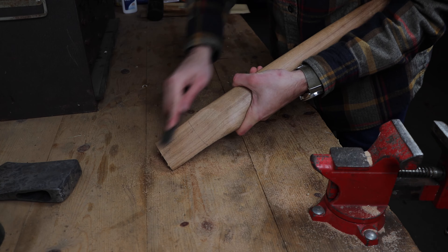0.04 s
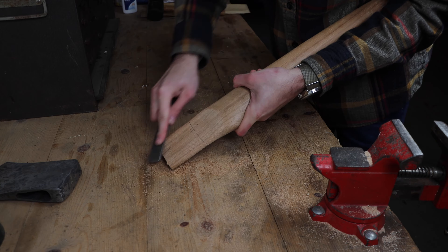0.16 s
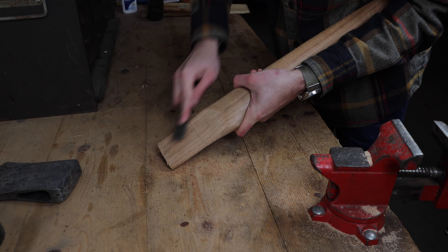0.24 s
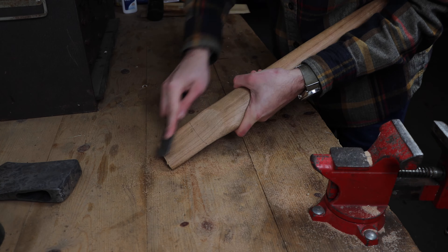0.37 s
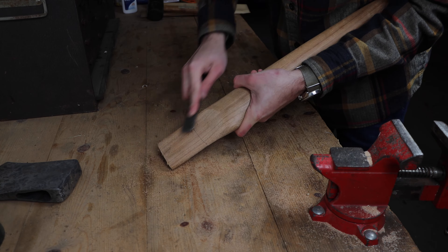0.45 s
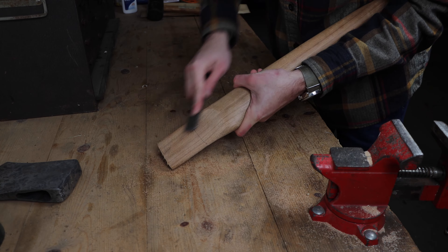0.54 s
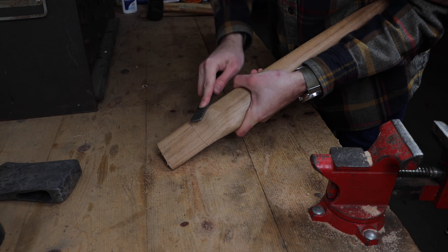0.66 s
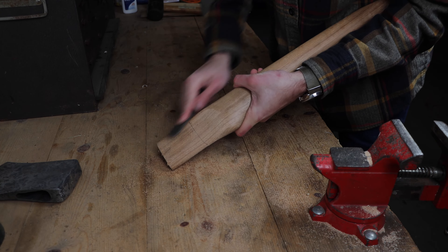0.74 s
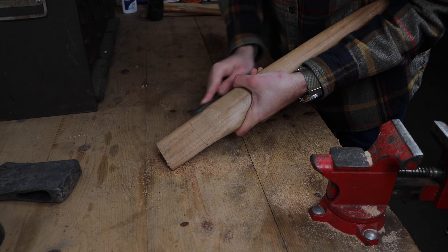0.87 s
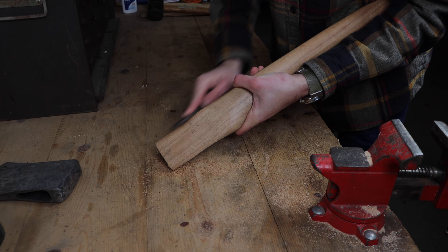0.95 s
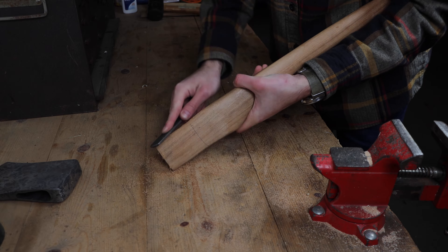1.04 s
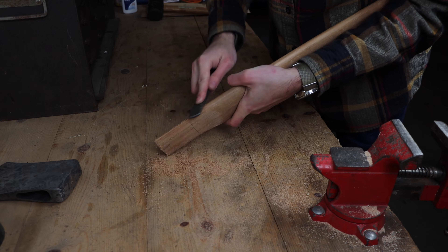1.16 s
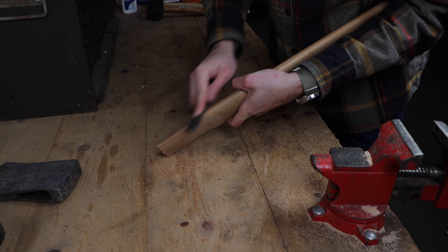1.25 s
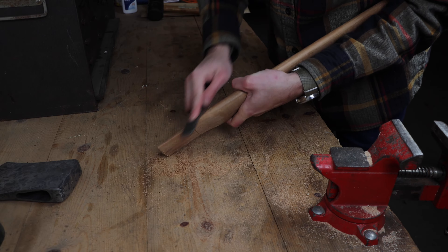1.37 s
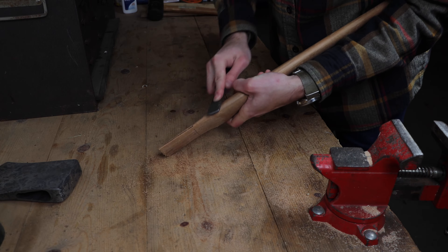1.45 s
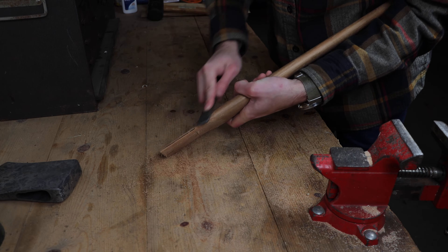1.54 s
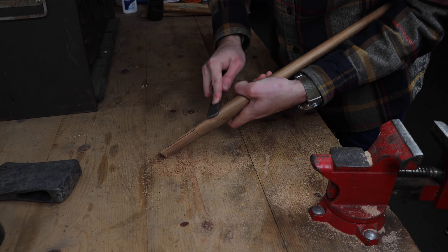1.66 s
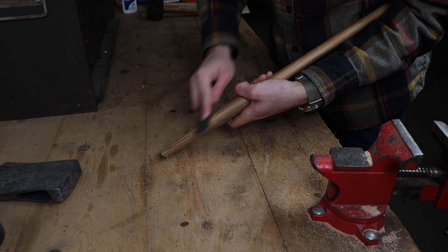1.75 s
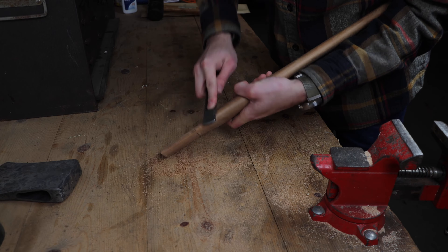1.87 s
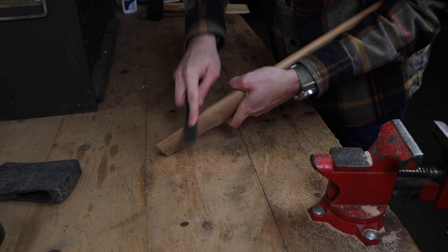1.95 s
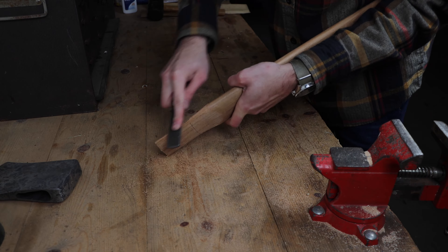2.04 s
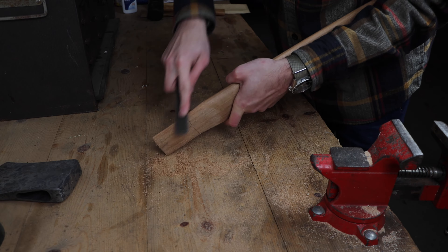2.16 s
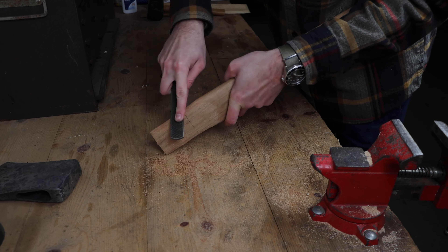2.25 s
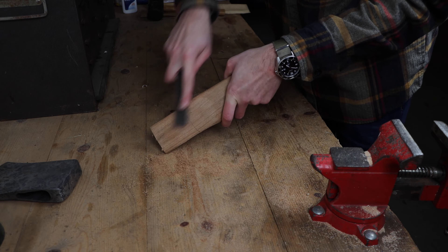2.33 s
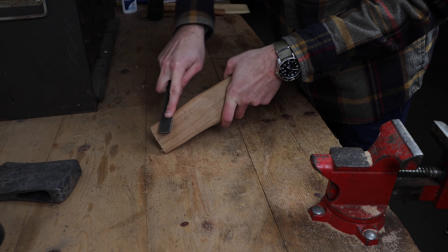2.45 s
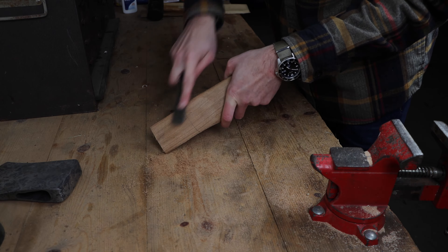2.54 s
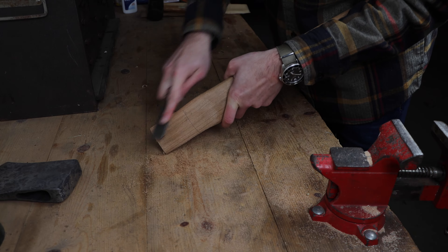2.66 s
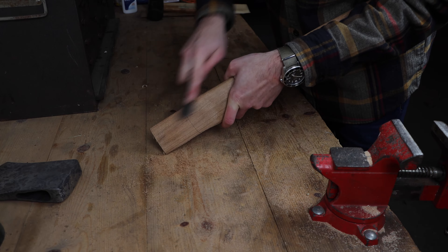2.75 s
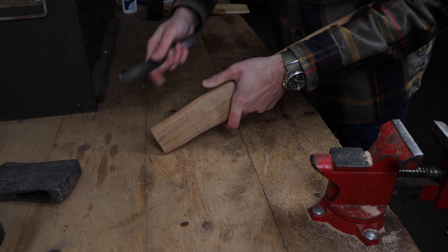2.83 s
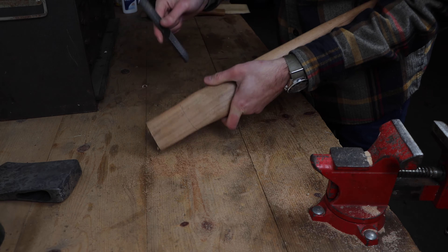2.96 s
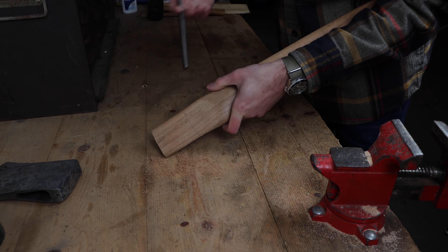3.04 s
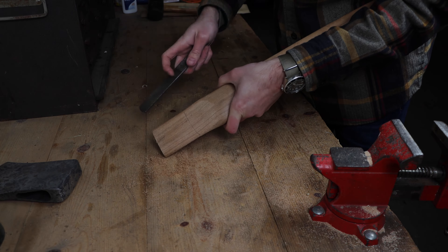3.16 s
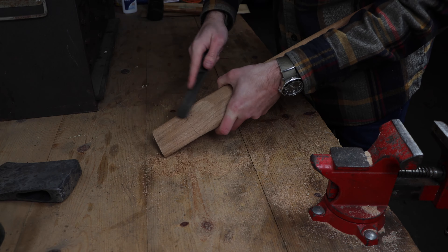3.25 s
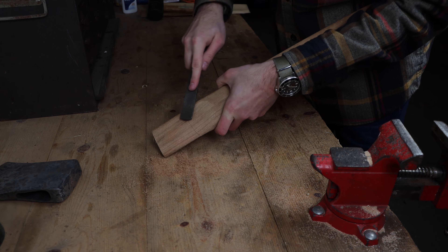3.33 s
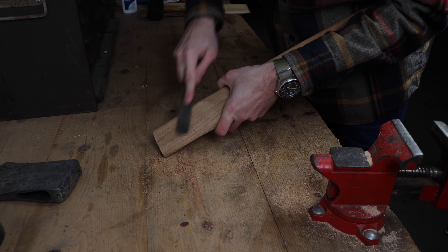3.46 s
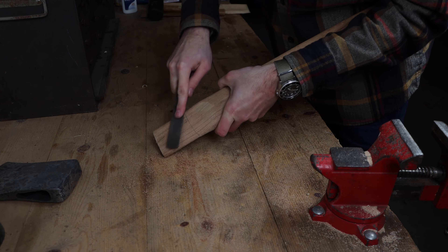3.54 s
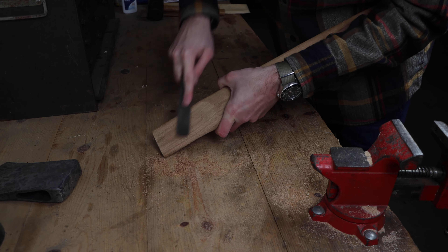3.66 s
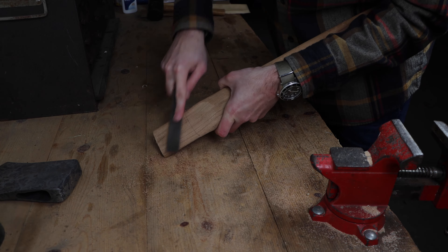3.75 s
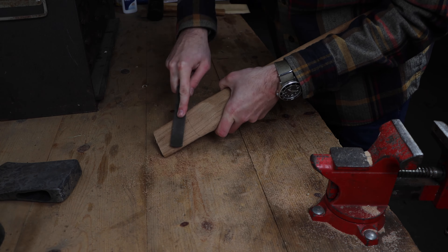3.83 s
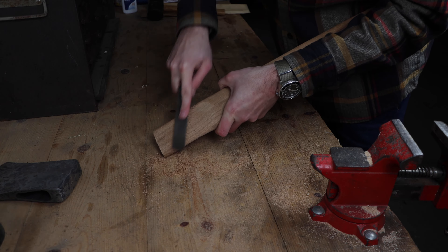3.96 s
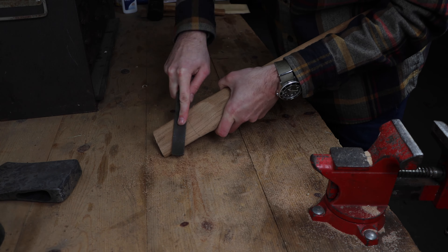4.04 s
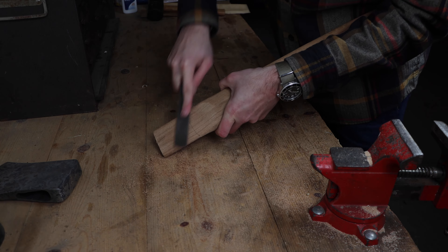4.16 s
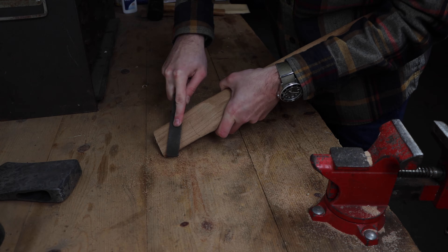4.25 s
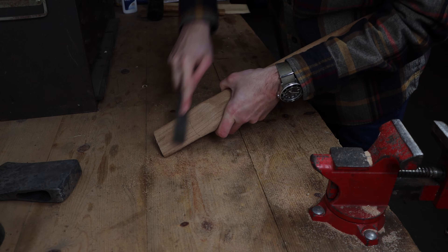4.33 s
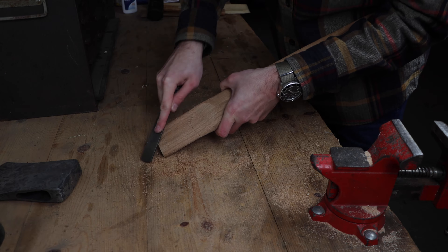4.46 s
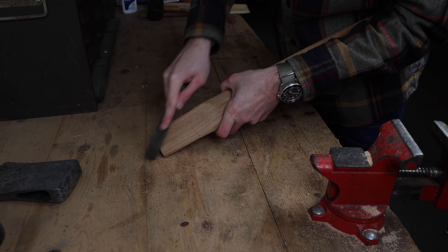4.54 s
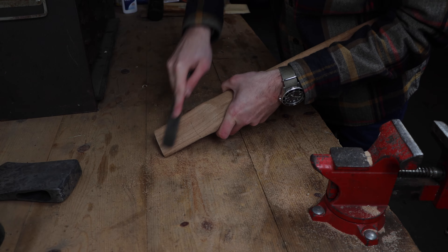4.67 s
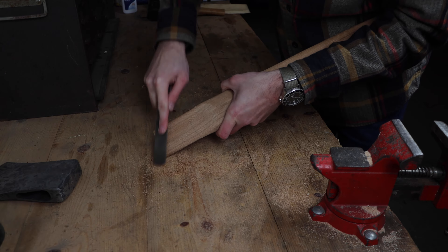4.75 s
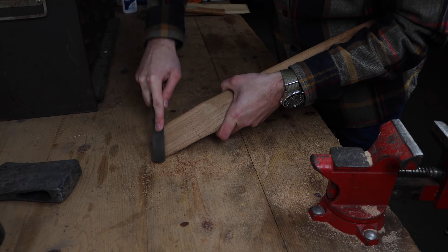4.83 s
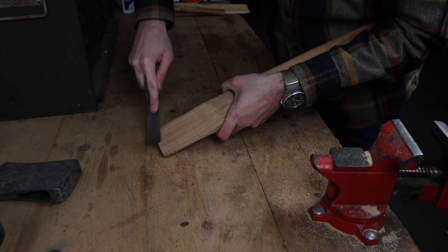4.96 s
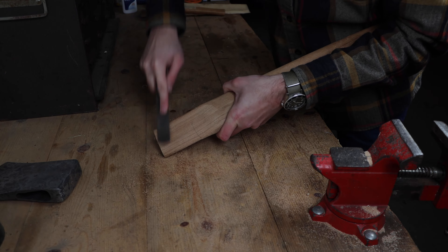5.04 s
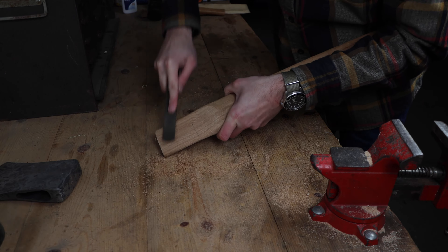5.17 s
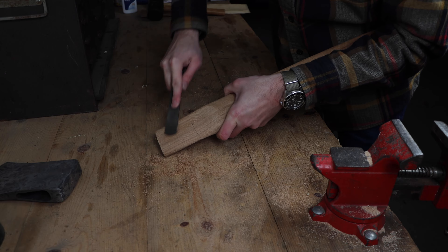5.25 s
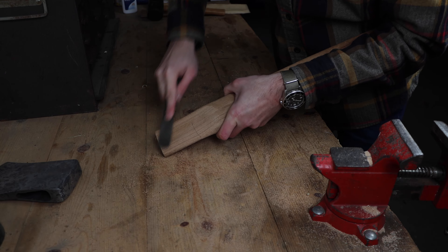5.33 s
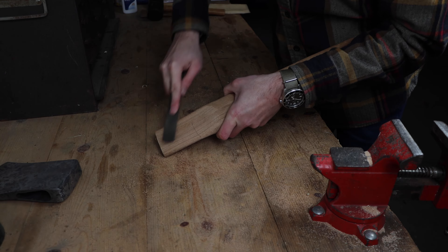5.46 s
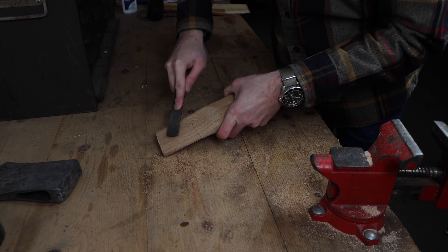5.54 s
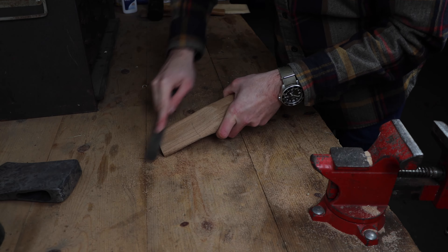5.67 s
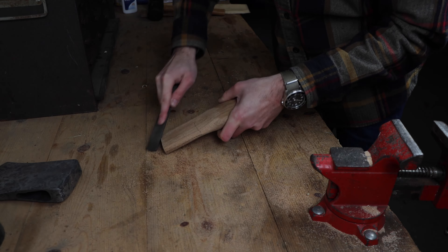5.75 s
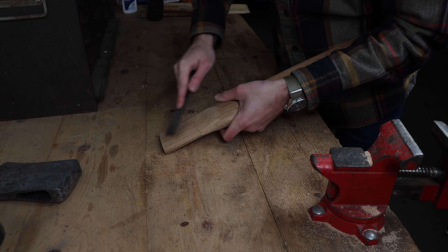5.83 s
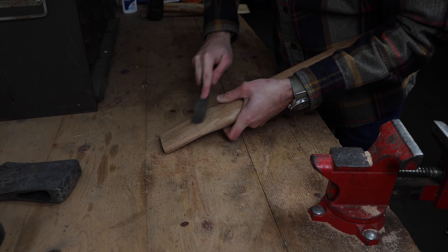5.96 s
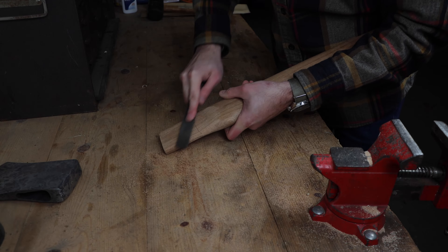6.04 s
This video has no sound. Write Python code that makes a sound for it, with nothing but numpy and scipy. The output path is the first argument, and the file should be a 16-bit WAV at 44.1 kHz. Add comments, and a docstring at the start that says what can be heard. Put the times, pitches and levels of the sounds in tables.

```python
"""Filing a wooden handle

A steel hand file scrubs quickly to and fro over a wooden handle whose end rests on a workbench.
Its teeth catch in a dense rattle that rings the bench, the handle and the file; the wood knocks
a few times and fingers brush it in the pauses. A small workshop answers, over a faint electric hum."""
import sys
import numpy as np
from scipy import signal
from scipy.fft import rfft, irfft
from scipy.io import wavfile
from scipy.ndimage import uniform_filter1d

SR = 44100
rng = np.random.default_rng(int(sys.argv[2]) if len(sys.argv) > 2 else 0)


def digitize_waveform(pressure):
    """Quantize a signal to 16-bit integers and store it at the path in sys.argv[1].

    Rows of a 2-D input are taken as channels; values are limited to [-1, 1].
    """
    field = np.atleast_2d(pressure).T
    bounded = np.clip(field, -1, 1)
    quanta = np.round(bounded * 32767).astype(np.int16)
    wavfile.write(sys.argv[1], SR, quanta)


N = 269010
T = np.arange(N) / SR
BENCH, SHAFT, HEAD, BLADE, TEETH = range(5)  # sounding parts, in column order
FREE_BLADE = 4  # knocks have this part in place of TEETH

# strokes, push and pull in turn: centre t/s, nominal length/ms, strength/dB, bite (extra cut depth)/dB
FILE_STROKES = [(0.01, 71, -42, 2.5), (0.06, 56, -41.5, 3), (0.117, 61, -44.0, 1.5), (0.173, 59, -39.5, -1),
                (0.225, 63, -44.5, -3.5), (0.276, 49, -41.0, -2), (0.338, 43, -41, 1),
                (0.382, 54, -38.5, -1.5), (0.441, 73, -46.5, -4.5), (0.498, 57, -39, -4),
                (0.556, 56, -44.5, -3.5), (0.605, 66, -42.0, -5), (0.663, 56, -42, -0.5),
                (0.721, 62, -41, 0), (0.777, 57, -44.5, 2.5), (0.827, 52, -39, -3), (0.879, 64, -44.5, 4),
                (0.93, 42, -40.5, -2), (0.984, 65, -45.5, 6), (1.036, 35, -40, 4), (1.198, 66, -55.5, 7),
                (1.27, 53, -38.5, -2), (1.327, 39, -38, 3), (1.394, 66, -40.0, 0.5), (1.447, 36, -39, -2),
                (1.502, 54, -41.5, -2.5), (1.556, 39, -39, 1), (1.609, 55, -40, 0.5),
                (1.666, 46, -40.5, -1.5), (1.723, 61, -40.5, -5), (1.776, 38, -39, -1.5),
                (1.828, 56, -39, -1), (1.881, 40, -43, -5.5), (1.935, 46, -34.5, -2),
                (1.995, 40, -36.0, 6.5), (2.046, 42, -34, -4), (2.098, 33, -40, 3.5),
                (2.146, 47, -38.0, -1), (2.197, 36, -40.0, 4.5), (2.251, 39, -34, 5.5),
                (2.307, 32, -42, -5), (2.354, 57, -40.5, -4), (2.41, 43, -43.5, -5.5),
                (2.46, 58, -39.5, 0.5), (2.513, 48, -48.5, -4.5), (2.564, 45, -36, 1.5),
                (2.622, 47, -42.0, -3), (2.676, 39, -33, 7.5), (2.733, 45, -40.5, -4),
                (2.78, 39, -37.5, -3), (3.419, 74, -37.5, 2.5), (3.482, 41, -39, 5), (3.533, 54, -34, 0),
                (3.589, 45, -40.5, 3), (3.635, 52, -34.5, 0), (3.688, 51, -40.5, 6), (3.739, 46, -33, 1.0),
                (3.79, 45, -39, 0), (3.838, 49, -35.0, 0), (3.893, 33, -42, 2), (3.94, 50, -35.5, -2),
                (3.994, 63, -41.5, 3), (4.047, 49, -35.5, -1.5), (4.094, 41, -37.5, 2),
                (4.146, 49, -35.0, -2.5), (4.197, 48, -39.5, 2), (4.253, 47, -34.5, -4),
                (4.307, 55, -40.5, 0), (4.357, 49, -34.5, -3.5), (4.41, 50, -42.5, 0.5),
                (4.46, 58, -41, -0.5), (4.503, 45, -41, -4.5), (4.555, 57, -41, 0.5), (4.6, 36, -41.5, 0.5),
                (4.642, 54, -41, 1), (4.694, 45, -43, 0), (4.746, 46, -37, 3), (4.792, 34, -36.5, -0.5),
                (4.834, 46, -30, 0.5), (4.881, 40, -34.5, -0.5), (4.925, 39, -32.5, -2.5),
                (4.97, 35, -36.5, 9), (5.017, 41, -32.5, -1.5), (5.064, 39, -35.5, -1.5),
                (5.108, 54, -33, -0.5), (5.159, 41, -37.5, 1.0), (5.207, 59, -31.5, 3.5),
                (5.258, 50, -38, -3.5), (5.311, 51, -33, 2), (5.357, 38, -38, -2.0), (5.407, 59, -34, 0.5),
                (5.451, 46, -41.5, 1.0), (5.503, 55, -37, -3.5), (5.545, 44, -41, -0.5),
                (5.594, 55, -36.0, 2), (5.634, 44, -42.5, 0), (5.686, 66, -38, 1.5), (5.729, 33, -29.5, -1),
                (5.765, 37, -39.5, -1), (5.795, 36, -58, -2), (5.972, 50, -49.0, 4.5),
                (6.035, 56, -38.0, 0.0), (6.084, 55, -44, -6)]
# pauses after which the push/pull order flips: t/s
FLIP_TIMES_S = [3.1, 5.9]
# handle turned and regripped, push gains: from t/s, bench/dB, shaft/dB, head/dB, blade/dB, teeth/dB
PUSH_GAINS = [(0, 5, 5.5, 0, -1, -6), (1.15, 0.5, 4.5, 4, 0.5, -5), (1.97, 4, 6.7, 4.5, -3.5, -9),
              (3.1, 5, 7.3, 1.5, -1, -10), (4.39, 5, 6, -3, 1, -4.5), (4.72, -1, 3.7, 4.5, 4, -2.5),
              (5.33, 1.5, 4.8, 0, 2.5, -2.5), (5.71, -10, 6.6, 7, -3, -13), (5.9, 1.5, 6.6, 4, 3, -8)]
# same columns for a pull, which presses the handle less onto the bench
PULL_GAINS = [(0, -2, 3, 4.2, 0, -6.5), (1.15, -3, 9.5, 9.4, -2, -10), (1.97, -11, 10, 9.7, -0.5, -11.5),
              (3.1, -7, -3, 6.4, 3, -2), (4.39, -0.5, 2.5, 1.3, 5, -4), (4.72, -5, 2, 3.6, 9, -3.5),
              (5.33, -10, 1, 4.2, 8.5, 0.5), (5.71, 0, 8.5, 0.92, -0.5, -11.5),
              (5.9, 0.5, 9.5, 1.6, 3, -14)]
# a deep cut shakes the handle and mutes the file; per part: gain/(dB per dB of bite)
BITE_SLOPES = [-0.075, 0.57, 0.28, -0.48, -0.36]
# modes of the bench and of the handle's shaft and head: f/Hz, width/Hz, level/dB
BENCH_MODES = [(186.7, 30, -8.5), (271, 73, -8), (316.3, 42.4, 0), (423, 57.6, -4.5)]
SHAFT_MODES = [(572, 50.4, 0), (644.7, 57, -2), (759, 70, -2.5), (876, 113, -6), (992, 53, -2.5),
               (1170, 50, -2.5), (1367, 30, -9)]
HEAD_MODES = [(1675, 92, 0.5), (1870, 71, -4.5), (1960, 70, 0), (2142, 85, 0.5), (2336, 350, -9)]
# modes of the file, pressed, held loosely or ringing freely: f/Hz, width/Hz, level/dB
BLADE_PRESSED_MODES = [(2520, 91, -15), (3200, 104, 1), (3425, 50, 1.5), (3538, 98, -4.5),
                       (3880, 200, -15.5), (4840, 246, -7), (5590, 360, -15.5), (6687, 187, -5.5),
                       (7260, 220, -15), (7500, 320, -14), (8910, 470, -11.5)]
BLADE_LOOSE_MODES = [(2500, 27, 10), (3074, 220, 2), (4190, 400, -1), (4920, 83, -21), (4740, 400, -13.5),
                     (6147, 150, -0.5), (7500, 470, -9), (7800, 33, -21), (8330, 200, -7)]
BLADE_FREE_MODES = [(1670, 46, 6), (2640, 30, 5.5), (3095, 27, -11), (3930, 40, -2), (4100, 27, -19),
                    (5000, 50, -13), (6100, 70, -18), (8600, 70, -19)]
TEETH_PRESSED_MODES = [(10560, 600, -3.5), (12100, 140, -3), (12750, 790, -3), (14100, 1000, 1.5),
                       (14440, 500, -15), (15760, 220, 3)]
TEETH_LOOSE_MODES = [(10100, 240, -2), (12000, 230, -0.5), (12800, 250, -2), (12650, 260, 1),
                     (13300, 460, 0), (15300, 1400, -5.5)]
# file contact: t/s, looseness (0 pressed flat on the face, 1 resting lightly on the edge)
LOOSENESS = [(0, 0.07), (1.1, 0.18), (1.2, 0.99), (2.2, 0.98), (2.4, 0.39), (2.9, 0.17), (3.0, 0.81),
             (3.35, 0.94), (3.4, 0.15), (4.4, 0.27), (4.8, 0.017), (6.1, 0.083)]
# swept band of the rasp: t/s, gain/dB
SWEEP_GAINS = [(0, -5), (0.6, -4), (0.9, -14), (1.2, -20), (3.3, -20), (3.4, -15), (4.5, -15), (4.8, -20),
               (6.1, -20)]
# room air: f/Hz, relative spectral density/dB
AIR_SPECTRUM = [(30, -19), (100, -3), (160, -5), (300, -7), (600, -2.5), (1040, -7), (1720, -12),
                (4000, -24), (16000, -37.5)]
# electric hum: f/Hz, level/dB
HUM_LINES = [(360.7, -59.5), (452.2, -71), (602.9, -59), (764.4, -66), (1206, -70)]
# finger brushes: centre t/s, length/ms, level/dB
FINGER_BRUSHES = [(1.105, 130, -54), (2.962, 26, -68), (3.02, 45, -51.5), (3.195, 41, -66),
                  (5.876, 10, -54), (5.86, 180, -65)]
# knocks: t/s, level/dB, offsets/dB (bench, shaft, head, held blade, free blade), contact time factor
WOOD_KNOCKS = [(1.1214, -11.5, -5, -18.5, -22, -50, -62, 2.9),
               (3.0024, -8, -12.5, -11.5, -20.5, -16, -60, 3.23),
               (3.2779, -21, -37, -12.5, -19, -9, -5.5, 1), (4.478, -16, -24, -12, -9.5, -8.5, -40, 0.87),
               (5.5131, -12.5, -34, -15.5, -13.5, -18, -50, 1.7),
               (5.6040, -18, -30, -10, -20, -20, -50, 1.7), (5.6987, -8, -51, -13, -17, -16, -50, 1.1),
               (5.765, -11.5, -42, -9.5, -11, -7.5, -50, 1.6),
               (5.8736, -22.5, -14.5, -8.5, -11.5, -1.5, -50, 4.1)]


def undb(db):
    return 10 ** (np.asarray(db) / 20)


def walk(rate_hz):
    """Random levels joined by ramps; spread near 1."""
    step = int(SR / rate_hz)
    held = np.repeat(rng.standard_normal(N // step + 1), step)[:N]
    return 1.2 * uniform_filter1d(held, step)


def arches(motions, exponent, stretch=1.0):
    """Each (t/s, length/ms, level/dB) motion speeds up, then stops; a higher exponent narrows it."""
    power = np.zeros(N)
    for centre_s, length_ms, db in motions:
        half_s = stretch * length_ms / 2000
        start, end = (int(np.clip((centre_s + side * half_s) * SR, 0, N)) for side in (-1, 1))
        arch = np.cos(np.pi / 2 * np.clip((T[start:end] - centre_s) / half_s, -1, 1))
        power[start:end] += (undb(db) * arch ** exponent) ** 2
    return np.sqrt(power)


def strokes(part, exponent, stretch, drag_share=0.072, drag_ms=39.5):
    """One part's envelope from strength, grip and bite; the file drags on faintly as it turns."""
    centre_s, length_ms, strength_db, bite_db = np.transpose(FILE_STROKES)
    is_push = (np.arange(len(centre_s)) + np.searchsorted(FLIP_TIMES_S, centre_s)) % 2 == 1
    push_db, pull_db = (grips[np.searchsorted(grips[:, 0], centre_s) - 1, 1 + part]
                        for grips in (np.array(PUSH_GAINS), np.array(PULL_GAINS)))
    level_db = strength_db + np.where(is_push, push_db, pull_db) + BITE_SLOPES[part] * bite_db
    power = arches(np.c_[centre_s, length_ms, level_db], exponent, stretch) ** 2
    drag = np.abs(uniform_filter1d(power, int(drag_ms * SR / 1000)))
    return np.sqrt(power + drag_share * drag)


def rattle(catches_per_s, spread_db, slip_db, slip_hz):
    """Teeth catch at random with uneven force, in short bursts as the file grips and slips."""
    caught = rng.random(N) < catches_per_s / SR
    force = caught * rng.standard_normal(N) * undb(spread_db * rng.exponential(size=N))
    force *= undb(slip_db * walk(slip_hz))
    return force / np.sqrt(np.mean(force ** 2))


def ring(rub, blow, modes, wander_db=0.0, wander_hz=25):
    """Damped modes of alternating sign; the rub reaches each unevenly as the contact moves."""
    impulse = signal.unit_impulse(8192)
    out, response = 0, 0
    for k, (hz, width_hz, db) in enumerate(modes):
        sign = (-1) ** k
        b, a = signal.iirpeak(hz, hz / width_hz, SR)
        force = rub * undb(wander_db * walk(wander_hz)) + sign * blow  # a blow starts all modes in step
        out += sign * undb(db) * signal.lfilter(b, a, force)
        response += sign * undb(db) * signal.lfilter(b, a, impulse)
    return out / np.sqrt(np.sum(response ** 2))


def wood():
    """Rattle and knocks shake bench and handle, which radiate neither deep bass nor treble."""
    coarse = rattle(catches_per_s=6000, spread_db=1.5, slip_db=1.04, slip_hz=220)
    bench = ring(coarse * strokes(BENCH, exponent=1.27, stretch=1.26),
                 knocks(BENCH, base_ms=0.84, gain_db=22.5), BENCH_MODES, wander_db=1.0)
    shaft = ring(coarse * strokes(SHAFT, exponent=1.4, stretch=1.09),
                 knocks(SHAFT, base_ms=0.21, gain_db=23.0), SHAFT_MODES, wander_db=2.5)
    head = ring(coarse * strokes(HEAD, exponent=1.7, stretch=1.0),
                knocks(HEAD, base_ms=0.15, gain_db=22.5), HEAD_MODES, wander_db=3.0)
    radiation = signal.butter(4, [160, 3200], "band", fs=SR, output="sos")
    return signal.sosfilt(radiation, bench + shaft + head)


def steel_file():
    """The blade rings and its teeth hiss through the fibres; a loose hold brings out other modes."""
    fine = rattle(catches_per_s=20000, spread_db=1.36, slip_db=2.0, slip_hz=160)
    rub = fine * strokes(BLADE, exponent=1.28, stretch=0.94)
    hiss = rng.standard_normal(N) * undb(1.24 * walk(rate_hz=200))
    hiss *= strokes(TEETH, exponent=1.54, stretch=0.92)
    blow = knocks(BLADE, base_ms=0.093, gain_db=14.5)
    out = ring(0, knocks(FREE_BLADE, base_ms=0.03, gain_db=19.0), BLADE_FREE_MODES)
    loose = np.interp(T, *np.transpose(LOOSENESS))
    for gain, blade_modes, teeth_modes in ((np.sqrt(1 - loose), BLADE_PRESSED_MODES, TEETH_PRESSED_MODES),
                                           (np.sqrt(loose), BLADE_LOOSE_MODES, TEETH_LOOSE_MODES)):
        out += ring(gain * rub, gain * blow, blade_modes, wander_db=1.86)
        out += ring(gain * hiss, gain * blow * undb(-6), teeth_modes, wander_db=3.0)
    return out


def rasp_sweep(low_hz=4400, high_hz=8200, half_width_hz=400, rising_db=-7):
    """Contact runs along the blade: a noise band falls early in one stroke, rises late in the next."""
    centre_s, length_ms = np.transpose(FILE_STROKES)[:2]
    nearest = np.argmin(np.abs(T[::64, None] - centre_s), axis=1).repeat(64)[:N]
    rising = nearest % 2
    offset = (T - centre_s[nearest]) * 1000 / length_ms[nearest]
    position = np.clip(0.3 + 1.5 * np.where(rising, offset, -offset), 0, 1)
    hz = low_hz + (high_hz - low_hz) * position
    noise = signal.lfilter(*signal.butter(2, half_width_hz, fs=SR), rng.standard_normal(N))
    band = noise / np.std(noise) * np.sin(2 * np.pi * np.cumsum(hz) / SR)
    gain_db = np.interp(T, *np.transpose(SWEEP_GAINS)) + rising_db * rising
    fade = np.sqrt(2 * np.sin(np.pi * position))
    return undb(gain_db) * band * fade * strokes(BLADE, exponent=0.91, stretch=0.8)


def workshop(direct, t60_s=0.33, gap_s=0.004, cutoff_hz=6600, gain_db=-15.5):
    """Small room: a short decaying tail, duller than the direct sound."""
    t = T[:SR // 2]
    tail = rng.standard_normal(len(t)) * undb(-60 * t / t60_s) * (t > gap_s)
    tail = signal.lfilter(*signal.butter(1, cutoff_hz, fs=SR), tail)
    tail /= np.sqrt(np.sum(tail ** 2))
    return undb(gain_db) * signal.fftconvolve(direct, tail)[:N]


def room_air(level_db=-56.5):
    """Steady, dull noise."""
    hz, db = np.transpose(AIR_SPECTRUM)
    bin_hz = np.maximum(np.arange(N // 2 + 1) * SR / N, 1)
    shape = undb(np.interp(np.log(bin_hz), np.log(hz), db))
    air = irfft(rfft(rng.standard_normal(N)) * shape, N)
    return undb(level_db) * air / np.std(air)


def electric_hum():
    """Faint tones, each wavering in phase."""
    out = np.zeros(N)
    for hz, db in HUM_LINES:
        waver_rad = 1.2 * np.cumsum(rng.standard_normal(N)) / np.sqrt(SR)
        out += np.sqrt(2) * undb(db) * np.sin(2 * np.pi * hz * T + waver_rad)
    return out


def fingers(highpass_hz=3500):
    """Skin on wood: a faint, bright rustle."""
    rustle = signal.lfilter(*signal.butter(1, highpass_hz, "high", fs=SR), rng.standard_normal(N))
    return rustle * arches(FINGER_BRUSHES, exponent=0.91)


def knocks(part, base_ms, gain_db):
    """Force on one part: a short smooth pulse per knock; soft contacts last longer."""
    force = np.zeros(N)
    for start_s, level_db, *offsets_db, softness in WOOD_KNOCKS:
        width = max(int(softness * base_ms * SR / 1000), 1)
        pulse = np.hanning(width + 2)[1:-1]
        start = int(start_s * SR)
        force[start:start + width] = undb(level_db + offsets_db[part] + gain_db) * pulse / pulse.sum()
    return force


def scene():
    """Filing and its room tail over air and hum; mono."""
    work = wood() + steel_file() + rasp_sweep() + fingers()
    return (work + workshop(work) + room_air() + electric_hum())[None]


def record(dry, bass_hz=120, top_hz=15790):
    """The microphone loses the deep bass; the recorder cuts the top."""
    thin = signal.sosfilt(signal.butter(1, bass_hz, "high", fs=SR, output="sos"), dry)
    return signal.sosfilt(signal.ellip(14, 0.3, 70, top_hz, fs=SR, output="sos"), thin)


dry = scene()
out = record(dry)
digitize_waveform(out)
```